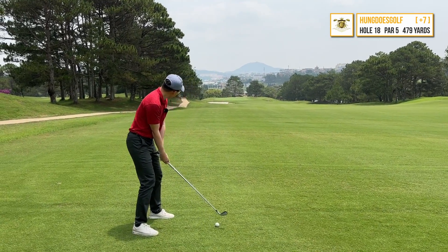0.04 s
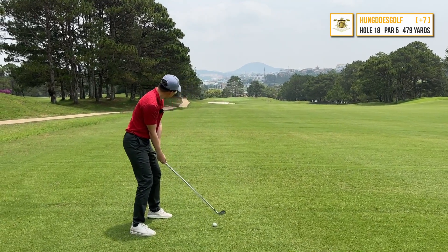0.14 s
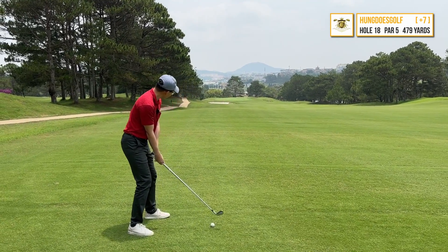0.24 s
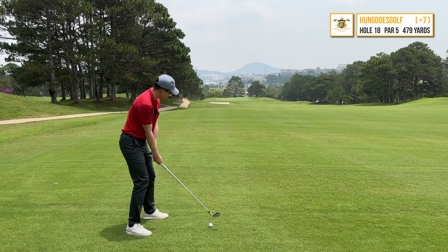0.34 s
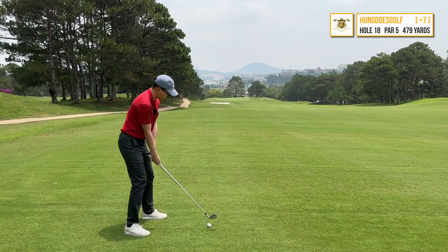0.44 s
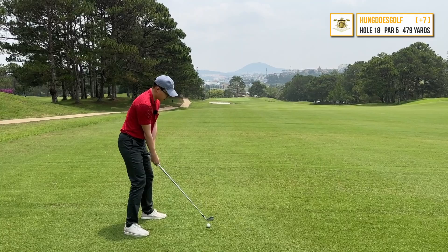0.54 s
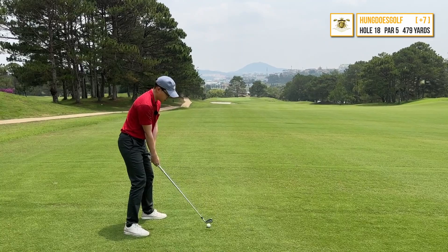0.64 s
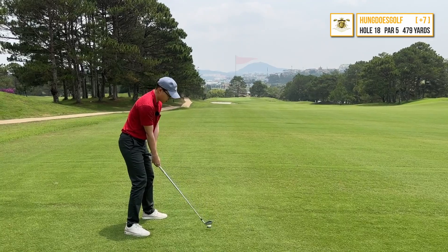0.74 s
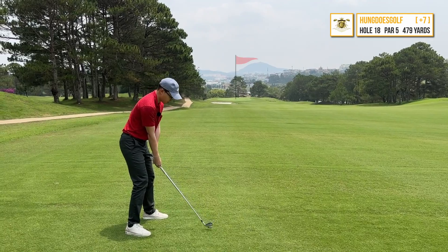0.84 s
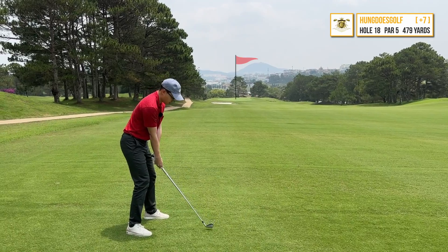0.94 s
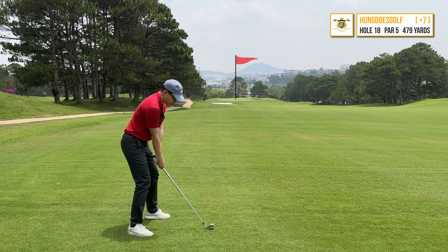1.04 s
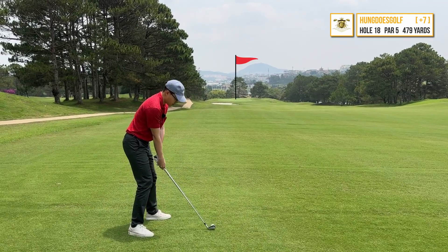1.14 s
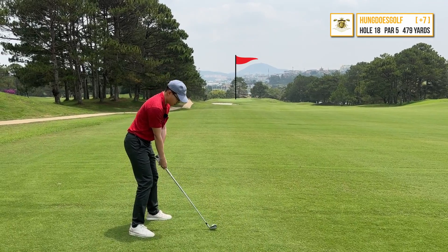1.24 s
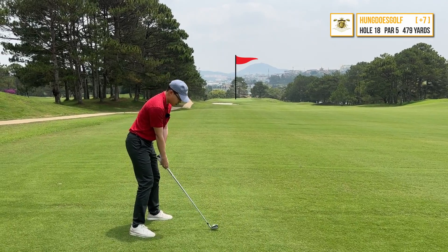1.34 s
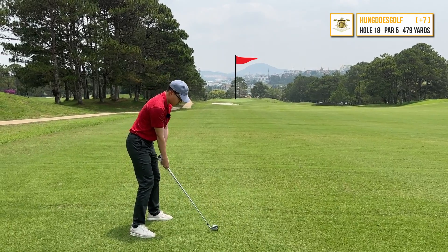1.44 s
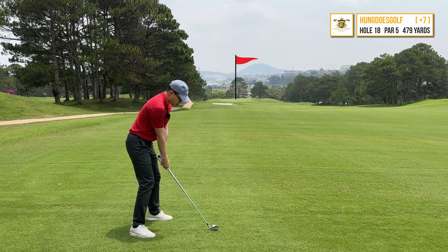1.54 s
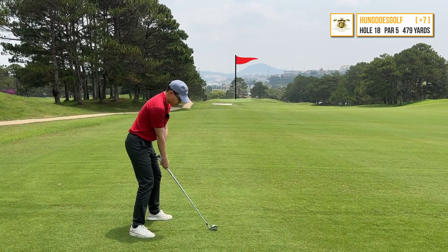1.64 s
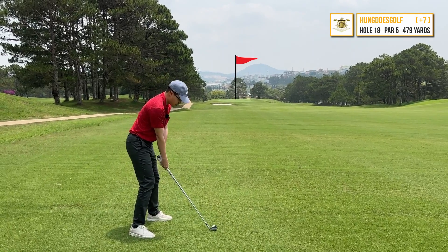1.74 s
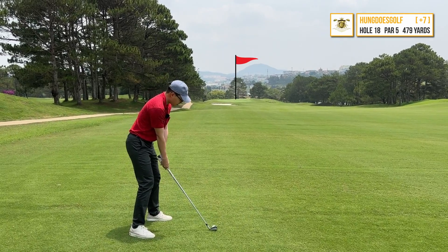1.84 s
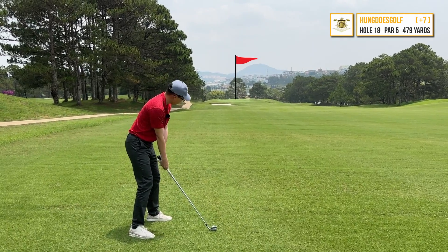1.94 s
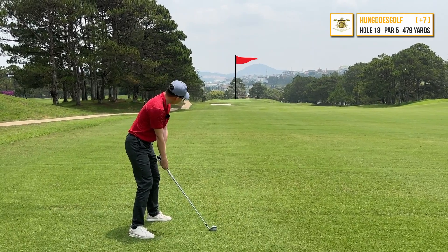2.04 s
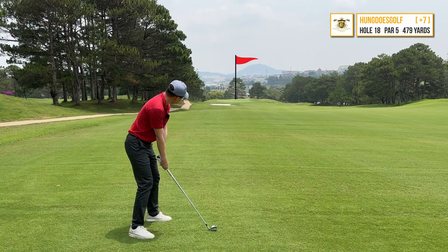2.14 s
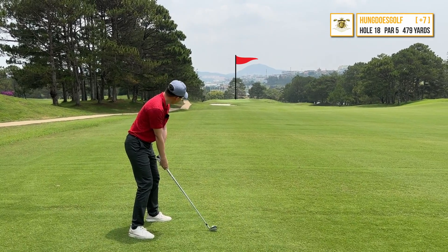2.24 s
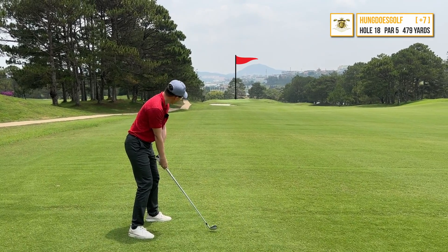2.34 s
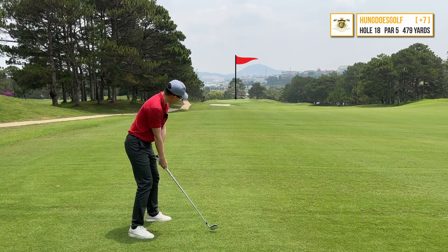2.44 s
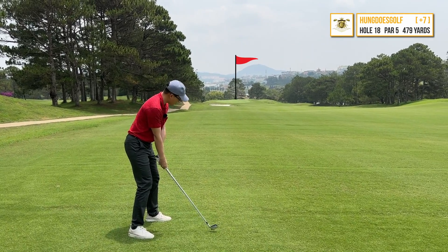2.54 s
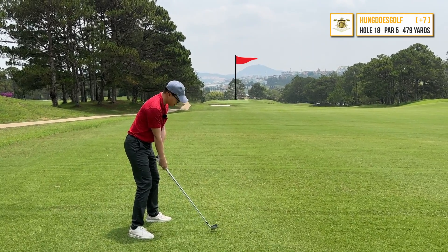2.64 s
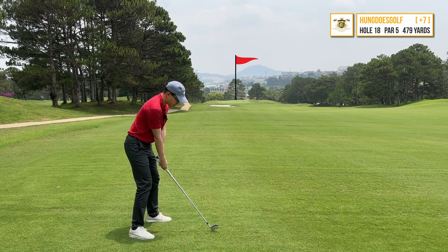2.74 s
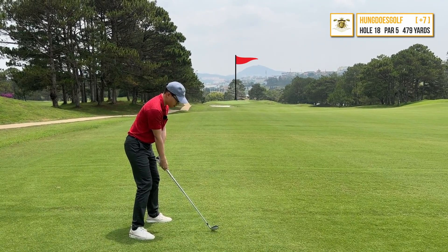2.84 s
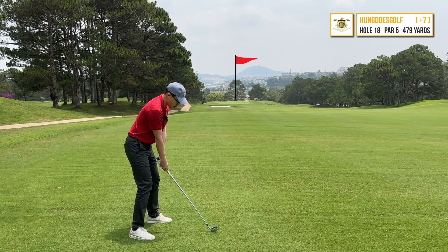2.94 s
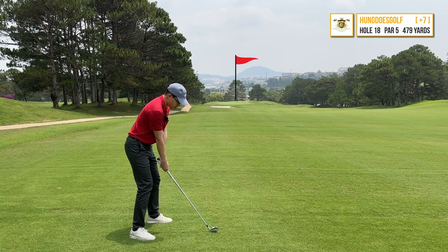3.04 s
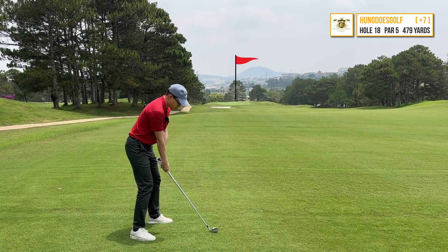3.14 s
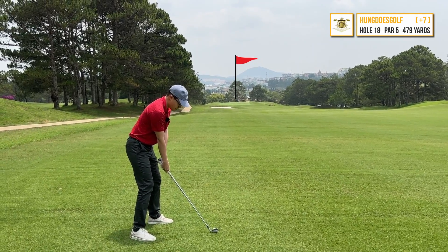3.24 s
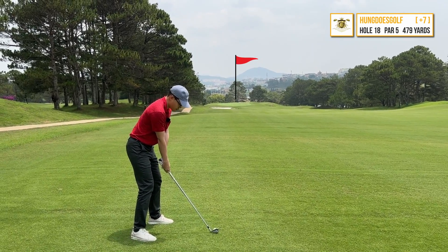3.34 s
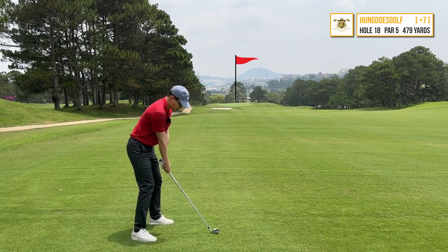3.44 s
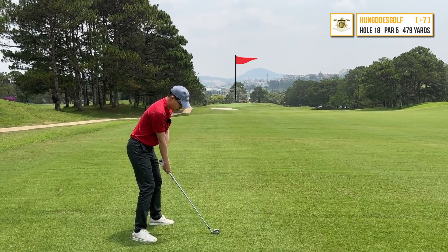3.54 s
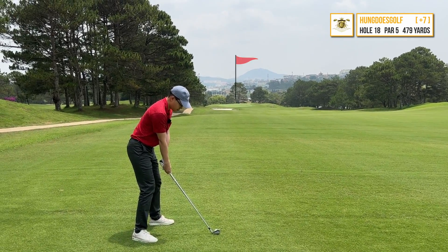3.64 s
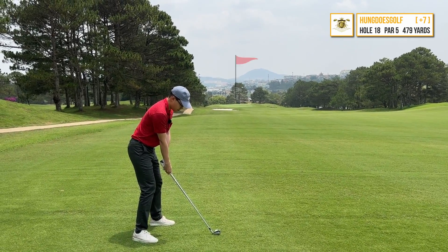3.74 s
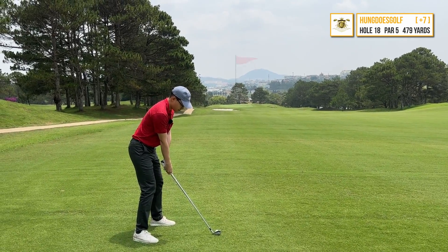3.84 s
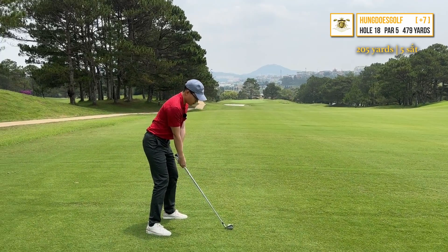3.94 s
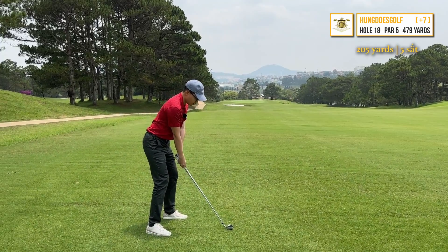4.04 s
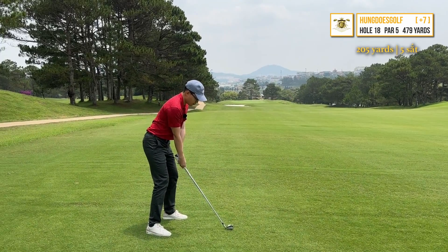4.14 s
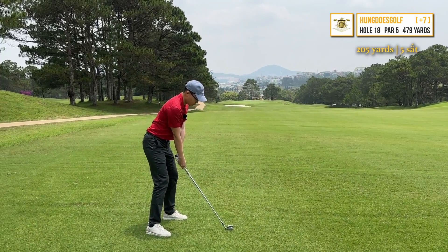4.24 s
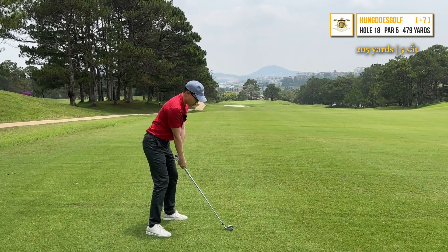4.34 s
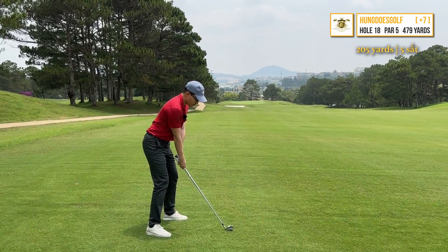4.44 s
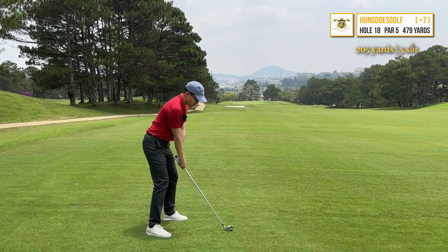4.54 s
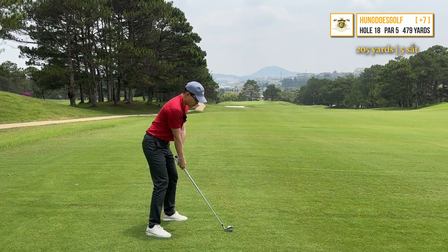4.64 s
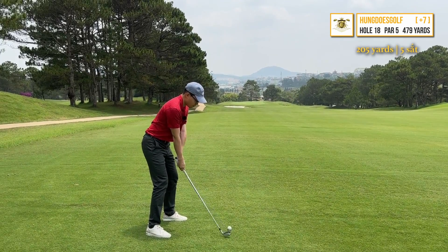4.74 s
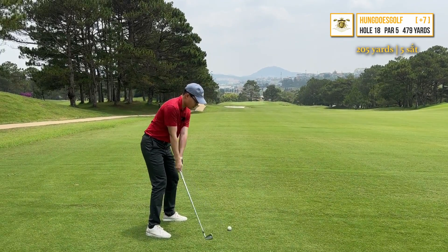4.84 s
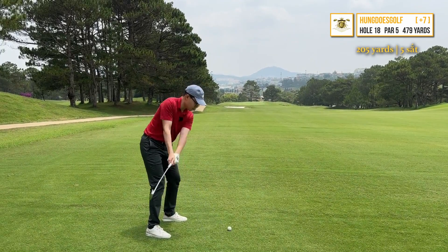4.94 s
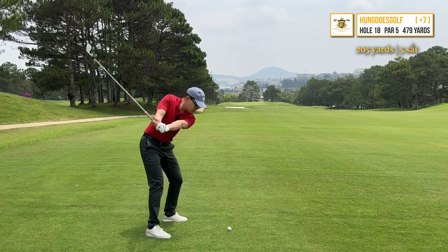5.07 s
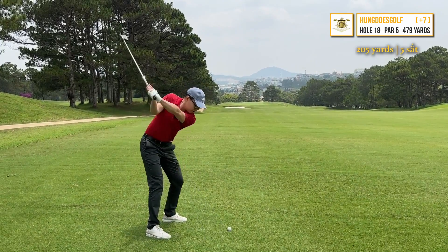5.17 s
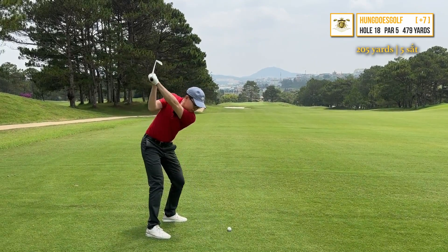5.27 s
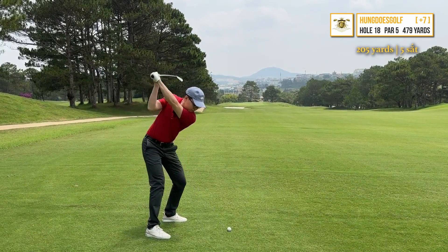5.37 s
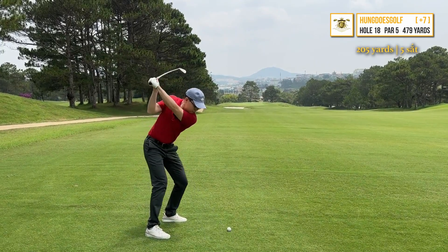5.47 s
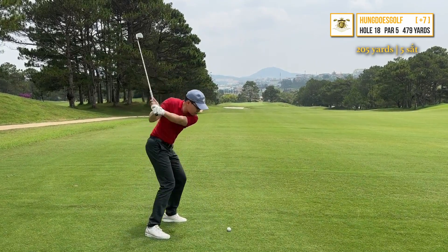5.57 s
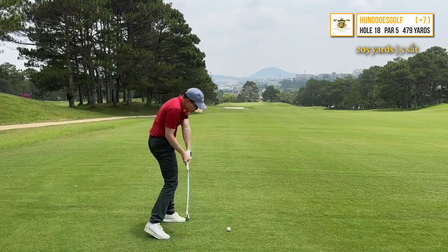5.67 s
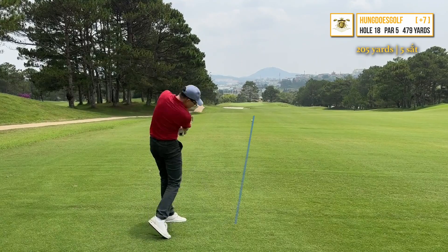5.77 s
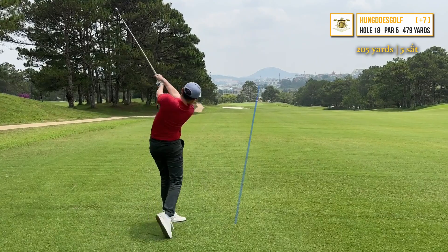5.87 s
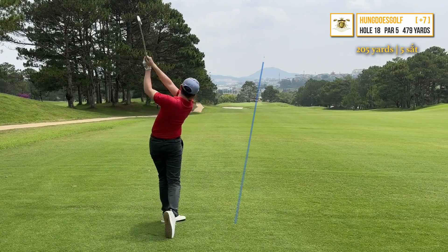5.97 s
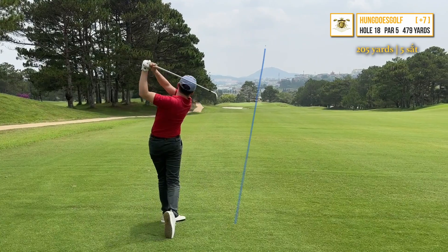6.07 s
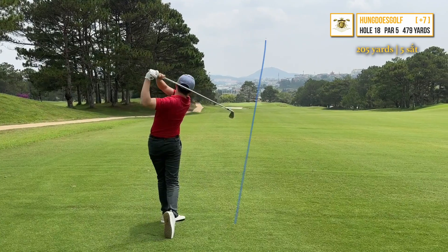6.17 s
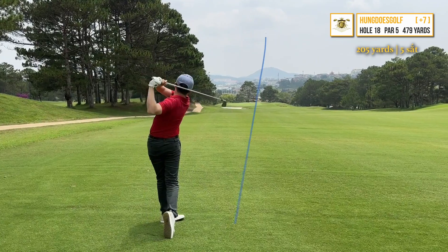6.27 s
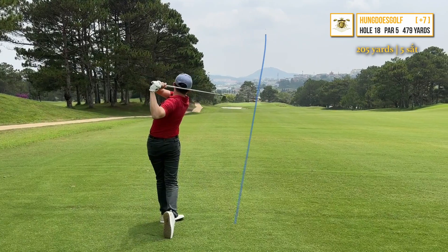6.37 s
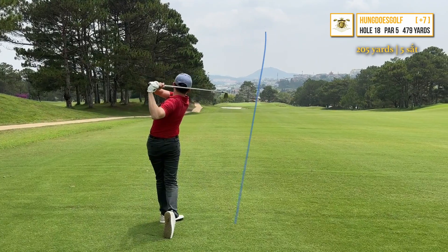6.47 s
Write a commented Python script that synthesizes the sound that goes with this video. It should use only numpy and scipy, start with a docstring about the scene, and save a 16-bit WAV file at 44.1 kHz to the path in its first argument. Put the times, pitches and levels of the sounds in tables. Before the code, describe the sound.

Faint insects chirr outdoors, then a golf club swishes and strikes a ball with one sharp, loud crack.

```python
"""An iron shot on a fairway

Insects chirr by stridulation in the trees, over a low rumble of air. Clothes rub, and the club clicks
lightly as it is taken back. It comes down with a turbulent hiss and a crisp snap, and vortex shedding
makes the shaft whistle. Impact excites the damped modes of head and ball, and the blade tears the turf.
A dull thump and a light tap follow; the ball whirs away, sinking in pitch, over a hushed chorus."""
import sys
import numpy as np
from scipy import signal
from scipy.fft import rfft, irfft, next_fast_len
from scipy.io import wavfile

SR = 44100
rng = np.random.default_rng(int(sys.argv[2]) if len(sys.argv) > 2 else 0)


def store_wav(level_fs):
    """Save 16-bit WAV to argv[1]."""
    pcm = np.round(np.clip(np.atleast_2d(level_fs), -1, 1) * 32767)
    wavfile.write(sys.argv[1], SR, pcm.T.astype(np.int16))


N = 287085
T = np.arange(N) / SR
CUTOFF_HZ = 16000

# Envelope of the insect chorus before any hush: (time [s], level [dB])
CHORUS_LEVELS = [(0.0, -57.5), (0.14, -58), (0.31, -59.5), (0.5, -56.5), (0.83, -56.5), (0.94, -57),
                 (1.33, -57), (1.41, -59.5), (1.62, -55.5), (1.87, -57.5), (1.98, -58), (2.1, -57),
                 (2.36, -56), (2.5, -57.5), (2.75, -58), (3.05, -57.5), (3.24, -57.5), (3.36, -56.5),
                 (3.67, -56), (3.93, -58), (4.03, -56), (4.45, -57), (4.66, -60.5), (4.8, -58)]
# Groups of insects pulsing together: (pulse rate [Hz], depth [dB])
CHORUS_THROBS = [(12.2, 1.0), (24.5, 0.73), (32.8, 1.1)]
# Two nearer insects: (frequency [Hz], width [Hz], level relative to the chorus [dB])
NEAR_VOICES = [(5480, 90, -12.5), (5730, 45, -13.5)]
# Steps by which the chorus drops away: (start [s], fade [s], drop [dB])
CHORUS_HUSHES = [(4.84, 0.16, 10), (5.67, 0.22, 16)]
# Gusts that lift the rumble, and rises of the treetop hiss: (time [s], level [dB], half length [s])
WIND_GUSTS = [(0.05, -73, 0.1), (0.318, -71.5, 0.12), (0.843, -69.5, 0.25), (1.28, -72.5, 0.098),
              (1.535, -77, 0.066), (1.942, -70.5, 0.17), (2.137, -74, 0.098), (2.94, -71, 0.26),
              (3.337, -76.5, 0.37), (4.197, -75, 0.74)]
TREE_RUSTLES = [(0.333, -70, 0.11), (2.05, -72.5, 0.4), (4.754, -81, 0.18)]
# Song of a lower insect: (start [s], hold [s], husk level [dB], tone level [dB])
SONG_BOUTS = [(.09, 0.047, -72.5, -84), (0.268, 0.12, -76, -81), (1.24, 0.12, -75, -84),
              (1.474, 0.89, -76, -84), (3.332, .26, -78, -79)]
# Small ticks and taps: (time [s], peak [dB], centre [Hz], width [Hz], t60 [s])
TICK_BURSTS = [(.1835, -60, 10500, 3000, 0.0033), (1.211, -65, 654, 180, 0.035),
               (1.465, -53, 4300, 900, .012), (3.31, -34.5, 7400, 1900, 0.002),
               (3.321, -54, 3000, 2500, 0.0052), (4.037, -52.5, 3220, 1800, .012),
               (4.9319, -41, 8200, 1100, .002), (5.143, -47, 4500, 2500, .005),
               (5.3147, -46.5, 450, 1100, 0.0071), (5.5128, -37, 800, 1000, 0.025),
               (5.516, -37, 3290, 1790, 0.019), (5.708, -37, 3600, 3970, 0.04),
               (5.7305, -33, 2850, 1500, 0.0045), (6.097, -53, 4500, 4000, .025),
               (6.143, -48, 4450, 4000, .008), (6.166, -52, 4800, 2500, .012),
               (6.189, -48, 4980, 4000, .004)]
# Puffs of friction: (time [s], level [dB], centre [Hz], width [Hz], half length [s])
SCUFF_PUFFS = [(.27, -77, 8500, 4000, .035), (.38, -76, 8200, 3500, .05), (1.224, -65.5, 3220, 1400, 0.042),
               (2.804, -72, 2900, 1000, 0.025), (3.051, -71.5, 3000, 1200, 0.059),
               (3.558, -69, 3300, 1300, 0.035), (3.844, -66.5, 3500, 1300, 0.015),
               (4.042, -65.5, 3340, 1600, 0.019), (4.113, -74, 2660, 700, 0.079),
               (4.308, -68.5, 3020, 1400, 0.068), (4.555, -78, 10200, 4500, .035),
               (5.622, -57.5, 5500, 2400, 0.042), (5.76, -66.5, 5500, 6000, .06),
               (5.88, -69, 5500, 2500, .035), (6.181, -69.5, 6500, 1500, .05),
               (6.345, -71, 6500, 6000, .03), (6.47, -65, 6000, 7000, .07)]
# Far-off calls: (time [s], level [dB], frequency [Hz], half length [s])
FAR_CHIRPS = [(.614, -73, 2960, .012), (.68, -79, 2990, .04), (4.113, -75, 2680, .045)]
# The player's moves, takeaway to finish: (start [s], hold [s], cloth level [dB], air level [dB])
BODY_MOVES = [(4.575, .38, -74.5, -72), (5.01, .35, -66, -65.5), (5.06, 0.1, -64.5, -76),
              (5.474, .004, -56, -56.5), (5.495, .015, -63, -48.5), (5.564, 0.038, -71, -53),
              (5.662, 0.1, -73, -53.5), (5.803, 0.05, -66.5, -59.5), (5.866, 0.68, -79, -60),
              (6.1, .075, -68, -65), (6.27, .03, -74, -71), (6.5, .01, -57.5, -54.5)]
# Contacts at the takeaway, then on ball and ground: (time [s], gain [dB], low-pass corner [Hz])
TAKEAWAY_CLICKS = [(4.8421, -30, 6760), (4.9319, -41, 18000), (4.9515, -37.5, 6500), (4.977, -50.5, 12000)]
FACE_BLOWS = [(5.55944, 15.0, 3446), (5.56097, 0.3, 20000)]
# A double snap in mid-downswing: (time [s], gain [dB])
SNAP_CONTACTS = [(5.505, -21.5), (5.5061, -26)]
# Modes of the clicks, the snap, and head and ball: (frequency [Hz], relative level [dB], t60 [s])
CLICK_RESONANCES = [(1380, -20.5, 0.0021), (3190, -3, 0.0026), (4670, -4, 0.0013), (6170, 1, 0.0017),
                    (8400, -7.5, 0.0012), (11100, -7.5, 0.0011)]
SNAP_RESONANCES = [(3600, -14, .004), (4490, -13, .005), (5510, -4, .0042), (6900, -9, .003),
                   (9570, -17.5, .0025), (12500, -23, 0.0018)]
HEAD_RESONANCES = [(140, -48, .061), (254, -51, .069), (446, -41, .0254), (716, -32, .0093),
                   (1000, -32.5, .0134), (1350, -22.5, .0059), (1860, -27.5, .0052), (2450, -20.5, .0044),
                   (3260, -22.5, .0065), (3910, -16.1, .0058), (4832, -7, .0045), (5540, -7.5, .0057),
                   (6040, -15, .0083), (6935, -13.5, .0085), (8039, -9.7, .0041), (9100, -3, .0016),
                   (9500, -25, .0085), (10670, -16.4, .0039), (12360, -17.5, .0051), (13999, -23.5, .0039)]
# Dull thumps and hollow knocks: (time [s], level [dB], frequency [Hz], t60 [s])
THUMP_MODES = [(5.5695, -29, 620, .003), (5.7037, -26, 189, 0.0087), (5.7068, -25, 82.5, 0.036),
               (5.7306, -30, 801, 0.0034), (5.7312, -38.5, 290, 0.01)]
# Waves of the ball's whir: (time [s], level [dB], centre [Hz], width [Hz], half length [s])
WHIR_WAVES = [(6.001, -61, 1396, 700, 0.14), (6.12, -58.5, 536, 230, 0.065), (6.193, -65, 400, 120, .03),
              (6.262, -64.5, 780, 250, 0.057), (6.29, -65, 1080, 140, .025)]
# Thin whistles in its flight: (time [s], level [dB], frequency [Hz], half length [s])
BALL_WHISTLES = [(5.95, -66, 1115, 0.027), (5.952, -68, 1670, .04), (6.002, -62.5, 1300, 0.038),
                 (6.0, -67, 690, 0.065), (7.4, -65.5, 765, .035)]

# Noise spectra: (frequency [Hz], relative spectral density [dB])
CHIRR_SPECTRUM = [(3800, -41), (4500, -18), (5000, -6.5), (5380, 0), (5730, -1.5), (5870, -3), (6550, -2.5),
                  (6900, -8), (7250, -20), (8000, -46)]  # massed insects
RUMBLE_SPECTRUM = [(20, -22.5), (45, -11.5), (80, 0.5), (160, -1.5), (250, -9), (400, -18.5), (750, -21),
                   (1300, -22.5), (2000, -30.5)]  # low wind
TREETOP_SPECTRUM = [(300, -10), (600, -17.5), (1200, -15), (1800, -16), (2300, -8.5), (2950, 2), (3500, -2),
                    (4200, -1), (7500, -6.5), (9000, -15.5), (12000, -25.5), (16000, -35)]  # distant air and trees
CLOTH_SPECTRUM = [(500, -18), (1400, -19.5), (2000, -8), (2700, 3.5), (3700, 1.5), (5000, -3),
                  (7500, -10.5), (10000, -17), (13000, -27.5), (16000, -34)]  # rubbing clothes
STIR_SPECTRUM = [(20, -19), (50, -6.5), (85, 0.5), (170, -2), (330, -12), (700, -11.5), (1100, -16.5),
                 (1600, -21), (2400, -17), (4000, -32), (8000, -30.5), (14000, -47)]  # air moved by the body
RUSH_SPECTRUM = [(200, -7.5), (600, -8), (1500, -6.5), (2500, 0), (3300, -3), (4300, 2), (6000, -2.5),
                 (8500, -4.5), (11000, -13), (13000, -24), (16000, -33.5)]  # air passing the club
TURF_SPECTRUM = [(100, -6), (500, 1), (1500, 0.5), (4000, 0), (6000, -4), (9000, -5.5), (12500, -5),
                 (16000, -22)]  # cut and thrown grass
SOIL_SPECTRUM = [(60, -2), (150, -3), (450, 0), (750, -1), (1200, -12), (2500, -24)]  # soil tearing under the blade


def from_db(db):
    """Amplitude ratio of a level in decibels."""
    return 10 ** (np.asarray(db) / 20)


def rms_one(x):
    """Normalisation to unit power."""
    return x / np.sqrt(np.mean(x ** 2) + 1e-20)


def power_sum(gains):
    """Incoherent sources add in power."""
    return np.sqrt(sum(gain ** 2 for gain in gains))


def add(out, start, sound):
    """Superposition of a short sound at its start time."""
    i = int(start * SR)
    out[i:i + len(sound)] += sound[:N - i]


def slopes(start, hold, attack, release):
    """Distance below a plateau, approached and left at constant rates per second."""
    return attack * np.maximum(start - T, 0) + release * np.maximum(T - start - hold, 0)


def swell(s, db, half_s):
    """Gaussian envelope, down to 1/e at half_s either side of its peak."""
    return from_db(db) * np.exp(-np.minimum(((T - s) / half_s) ** 2, 50))


def burst(start, db, t60):
    """Exponential decay from a sudden onset."""
    return (T >= start) * from_db(db - 60 * np.clip((T - start) / t60, 0, 4))


def drift(rate_hz):
    """Random fluctuation: low-passed noise of unit power."""
    step, settle = 40, 2000
    pole = np.exp(-2 * np.pi * rate_hz * step / SR)
    white = rng.standard_normal(N // step + settle + 2)
    slow = signal.lfilter([1], [1, -2 * pole, pole * pole], white)[settle:]
    return np.interp(np.arange(N) / step, np.arange(len(slow)), rms_one(slow))


def noise(spectrum):
    """Spectral shaping: unit-power noise that rolls off beyond the ends of its spectrum."""
    hz, db = np.transpose(spectrum)
    size = next_fast_len(N, True)
    f = np.maximum(np.arange(size // 2 + 1) * SR / size, 1)
    skirts = np.minimum(f / hz[0], 1) ** 2 * np.minimum(hz[-1] / f, 1) ** 4
    shape = skirts * from_db(np.interp(np.log(f), np.log(hz), db))
    return rms_one(irfft(rfft(rng.standard_normal(size)) * shape, size)[:N])


def grain(hz, width_hz, envelope):
    """Noise excitation of one broad resonance, scaled to peak 1."""
    low = np.hypot(hz, width_hz / 2) - width_hz / 2
    band = signal.butter(2, [low, min(low + width_hz, CUTOFF_HZ)], "band", fs=SR, output="sos")
    puff = signal.sosfilt(band, rng.standard_normal(len(envelope)) * envelope)
    return puff / np.abs(puff).max()


def phase_of(hz):
    """Phase is the time integral of frequency, steady or varying."""
    return 2 * np.pi * np.cumsum(np.broadcast_to(hz, N)) / SR


def narrowband(hz, width_hz):
    """Narrowband noise: a tone whose amplitude and phase wander."""
    phase = phase_of(hz)
    return drift(width_hz) * np.cos(phase) + drift(width_hz) * np.sin(phase)


def rough_tone(hz, width_hz, roughness):
    """A unit-power sinusoid, broadened by narrowband noise."""
    return np.sqrt(2) * np.sin(phase_of(hz)) + roughness * narrowband(hz, width_hz)


def sinking(s, hz, octaves_per_s):
    """Exponential downward glide, one second long, passing through hz at time s."""
    return hz * 2 ** (-octaves_per_s * np.clip(T - s, -.5, .5))


def ring(start, hz, t60):
    """A damped mode whose envelope builds to 1 during contact, then decays."""
    subsample_s = start - int(start * SR) / SR
    age = np.maximum(T[:SR // 4] - subsample_s, 0)
    time_constants = age * np.log(1000) / t60
    return time_constants * np.exp(1 - time_constants) * np.sin(2 * np.pi * hz * age)


def hush_db():
    """Attenuation of the chorus: successive drops add in decibels."""
    return sum(drop_db * np.clip((T - s) / fade, 0, 1) for s, fade, drop_db in CHORUS_HUSHES)


def insect_chorus(gain_db=0.2, flutter_db=1.04, grain_db=0.5, wander=0.034):
    """Stridulation: many insects blur into one band, amplitude-modulated at their pulse rates."""
    throb_db = sum(depth * np.sin(phase_of(rate * (1 + wander * drift(2.6))))
                   for rate, depth in CHORUS_THROBS)
    rasp = from_db(throb_db + flutter_db * drift(24.98) + grain_db * drift(350))
    near = sum(from_db(db) * narrowband(hz, width_hz) for hz, width_hz, db in NEAR_VOICES)
    level_db = gain_db + np.interp(T, *np.transpose(CHORUS_LEVELS)) - hush_db()
    return from_db(level_db) * rms_one((noise(CHIRR_SPECTRUM) + near) * rasp)


def wind(calm_db=-79.5, hiss_db=-72.5, gust_share=0.1, hush_share=0.14, flicker_db=1.0):
    """Broadband flow noise: a gusting rumble, hiss from the trees and one faint far-off swell."""
    calm = from_db(calm_db)
    rumble = power_sum([calm] + [swell(*gust) for gust in WIND_GUSTS])
    hiss = from_db(hiss_db) * (rumble / calm) ** gust_share
    hiss = power_sum([hiss] + [swell(*rustle) for rustle in TREE_RUSTLES])
    hiss *= from_db(flicker_db * drift(12) - hush_share * hush_db())
    far_band = rms_one(grain(hz=760, width_hz=320, envelope=np.ones(N)))
    far = swell(s=2.074, db=-74, half_s=0.12) * far_band
    return rumble * noise(RUMBLE_SPECTRUM) + hiss * noise(TREETOP_SPECTRUM) + far


def low_insect(hz=4130, fade_db_per_s=250):
    """Stridulation in bouts: a lower voice, a thin tone inside a husky band."""
    husk = rms_one(grain(hz, width_hz=900, envelope=np.ones(N)))
    tone = narrowband(hz, width_hz=55)
    out = np.zeros(N)
    for s, hold, husk_db, tone_db in SONG_BOUTS:
        envelope = from_db(-slopes(s, hold, fade_db_per_s, fade_db_per_s))
        out += envelope * (from_db(husk_db) * husk + from_db(tone_db) * tone)
    return out


def ticks():
    """Transient excitation: each tick is a decaying noise burst in its own broad resonance."""
    out = np.zeros(N)
    for s, db, hz, width_hz, t60 in TICK_BURSTS:
        decay = from_db(-60 * T[:SR // 20] / t60)
        add(out, s, from_db(db) * grain(hz, width_hz, decay))
    return out


def scuffs(crest_db=9, crinkle_db=3):
    """Friction noise: each scuff is a soft, grainy puff that swells and fades."""
    out, age = np.zeros(N), T[:SR // 4]
    middle = age.mean()
    for s, db, hz, width_hz, half_s in SCUFF_PUFFS:
        bell = np.exp(-2 * ((age - middle) / half_s) ** 2)
        crinkle = from_db(crinkle_db * drift(110)[:len(age)])
        add(out, s - middle, from_db(db + crest_db) * grain(hz, width_hz, bell * crinkle))
    return out


def chirps(width_hz=70):
    """Amplitude modulation: each far call is a thin, wavering tone that swells and fades."""
    return sum(swell(s, db, half_s) * narrowband(hz, width_hz) for s, db, hz, half_s in FAR_CHIRPS)


def player(crinkle_db=2.5):
    """Friction and air displacement: clothes rub and the air stirs as the body turns."""
    cloth, stir = [], []
    for s, hold, cloth_db, stir_db in BODY_MOVES:
        fade_db = slopes(s, hold, attack=219.5, release=240)
        cloth.append(from_db(cloth_db - fade_db))
        stir.append(from_db(stir_db - fade_db))
    crinkle = from_db(crinkle_db * drift(90))
    return power_sum(cloth) * crinkle * noise(CLOTH_SPECTRUM) + power_sum(stir) * noise(STIR_SPECTRUM)


def club_clicks(scatter_db=1.6):
    """Modal ringing: each light click of the takeaway excites the same few modes."""
    out = np.zeros(N)
    for s, click_db, corner_hz in TAKEAWAY_CLICKS:
        for k, (hz, db, t60) in enumerate(CLICK_RESONANCES):
            gain = from_db(click_db + db + rng.normal(0, scatter_db))
            rolloff = np.hypot(1, (hz / corner_hz) ** 2)
            add(out, s, (-1) ** k * gain / rolloff * ring(s, hz, t60))
    return out


def downswing(fastest_s=5.550, top_hz=722, whistle_db=-37, rush_db=-52, turbulence_db=1.4):
    """Turbulence hisses; vortex shedding whistles, highest and loudest where the club is fastest."""
    octaves_down = slopes(fastest_s, hold=0, attack=10, release=24)
    tone = rough_tone(top_hz * 2 ** -octaves_down, width_hz=290, roughness=0.52)
    whistle = from_db(whistle_db - slopes(fastest_s, hold=0, attack=598, release=519.5))
    rush = from_db(rush_db - slopes(start=5.412, hold=0.135, attack=168, release=274.5))
    flare = swell(s=5.472, db=-40, half_s=0.015)
    hiss = power_sum([rush, flare]) * from_db(turbulence_db * drift(120))
    return hiss * noise(RUSH_SPECTRUM) + whistle * tone


def snap():
    """Impulse response: two quick contacts ring the same bright modes as the club comes down."""
    out = np.zeros(N)
    for s, snap_db in SNAP_CONTACTS:
        for k, (hz, db, t60) in enumerate(SNAP_RESONANCES):
            add(out, s, (-1) ** k * from_db(snap_db + db) * ring(s, hz, t60))
    return out


def strike():
    """Impact: a dull blow and a bright one ring the head; the blade cuts turf and tears soil."""
    crack = np.zeros(N)
    for s, blow_db, corner_hz in FACE_BLOWS:
        for hz, db, t60 in HEAD_RESONANCES:
            rolloff = np.hypot(1, (hz / corner_hz) ** 4)
            add(crack, s, from_db(blow_db + db) / rolloff * ring(s, hz, t60))
    ground_s = FACE_BLOWS[-1][0]
    cut = burst(ground_s, db=-20, t60=0.019)
    grass_spray = burst(ground_s, db=-39, t60=0.12)
    tear = burst(ground_s, db=-45, t60=0.33)
    return crack + (cut + grass_spray) * noise(TURF_SPECTRUM) + tear * noise(SOIL_SPECTRUM)


def thumps():
    """Heavy damping: each thump or knock is one mode that dies within a few cycles."""
    out = np.zeros(N)
    for k, (s, db, hz, t60) in enumerate(THUMP_MODES):
        add(out, s, -(-1) ** k * from_db(db) * ring(s, hz, t60))
    return out


def ball_whir(echo_s=0.001012, lag_s_per_s=0.00502, echo_gain=0.55):
    """Comb filtering: the sinking whir meets its echo off the turf, which lags as the ball climbs."""
    launch_s = FACE_BLOWS[0][0]
    lag_s = echo_s + lag_s_per_s * np.maximum(T - launch_s, 0)
    out = np.zeros(N)
    for s, db, hz, width_hz, half_s in WHIR_WAVES:
        whir = narrowband(sinking(s, hz, octaves_per_s=1.8), width_hz)
        echo = echo_gain * np.interp(T - lag_s, T, whir)
        out += swell(s, db, half_s) * rms_one(whir + echo)
    return out


def ball_whistles(hum_hz=85):
    """Vortex shedding: thin sinking whistles stand out of the whir, over a faint low hum."""
    out = swell(s=6.25, db=-63.5, half_s=0.3) * np.sqrt(2) * np.sin(2 * np.pi * hum_hz * T)
    for s, db, hz, half_s in BALL_WHISTLES:
        pitch_hz = sinking(s, hz, octaves_per_s=1.4)
        out += swell(s, db, half_s) * rough_tone(pitch_hz, width_hz=60, roughness=0.45)
    return out


def scene():
    """Superposition in the open air: the sources add in one channel, without reverberation."""
    shot = player() + club_clicks() + downswing() + snap() + strike() + ticks() + thumps()
    flight = ball_whir() + ball_whistles()
    surroundings = insect_chorus() + low_insect() + wind() + scuffs() + chirps()
    return (shot + flight + surroundings)[None]


def record(dry):
    """Soft saturation: the crack overloads the microphone; a steep low-pass cuts the top."""
    low_pass = signal.ellip(10, .1, 80, CUTOFF_HZ, fs=SR, output="sos")
    return signal.sosfilt(low_pass, np.tanh(dry))


dry = scene()
out = record(dry)
store_wav(out)
```